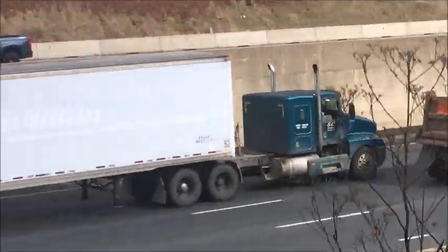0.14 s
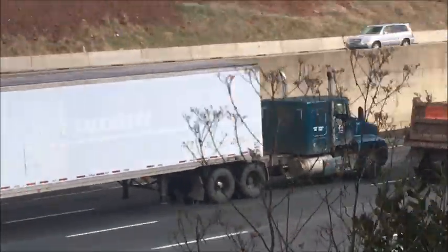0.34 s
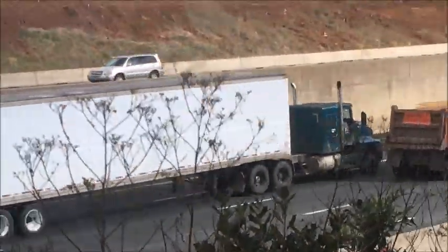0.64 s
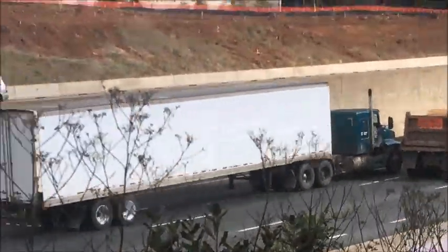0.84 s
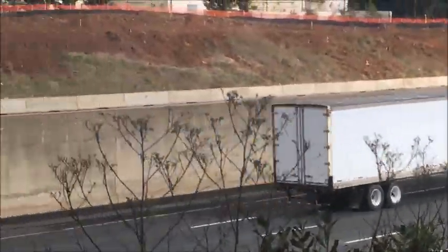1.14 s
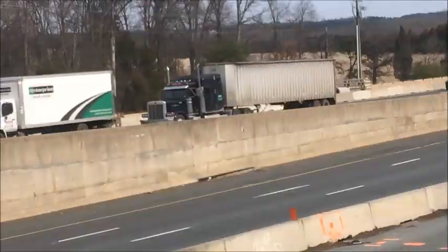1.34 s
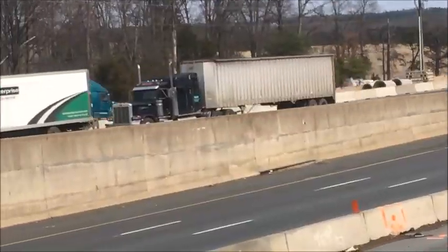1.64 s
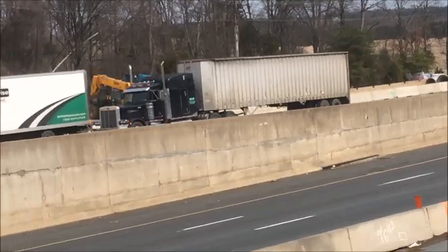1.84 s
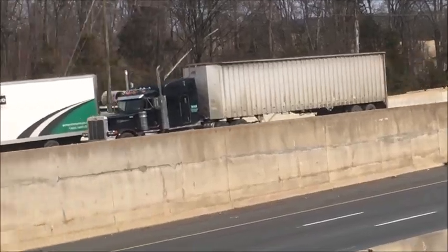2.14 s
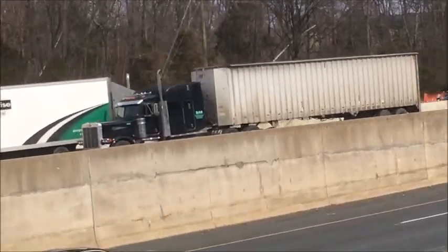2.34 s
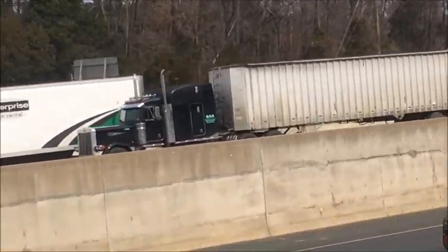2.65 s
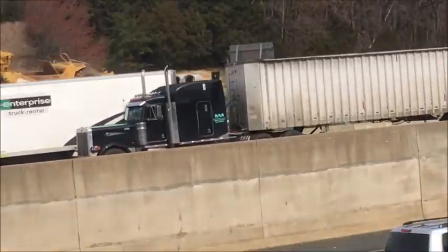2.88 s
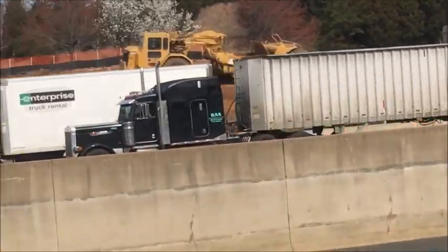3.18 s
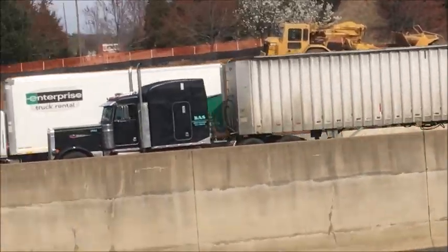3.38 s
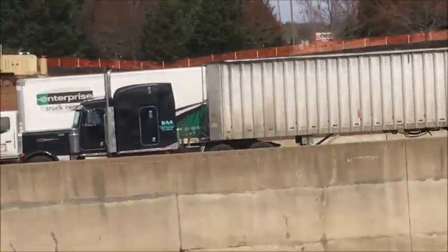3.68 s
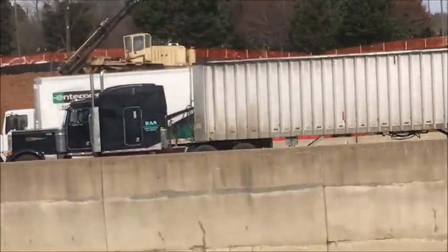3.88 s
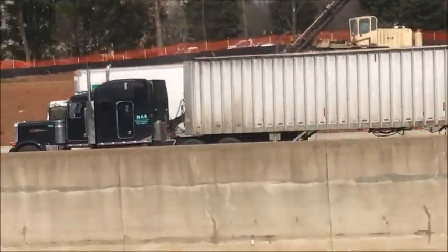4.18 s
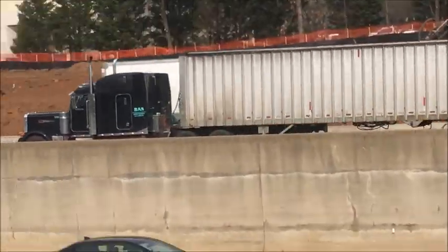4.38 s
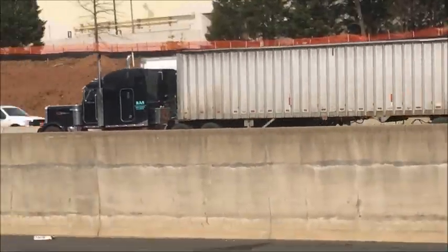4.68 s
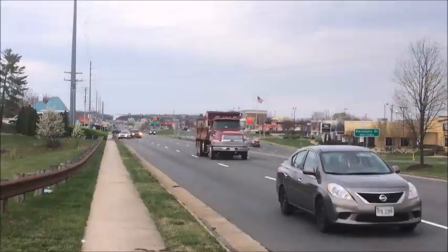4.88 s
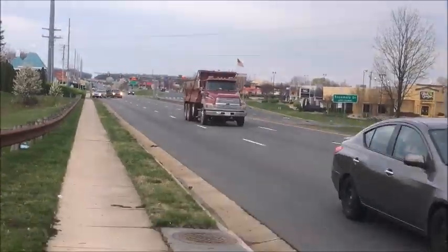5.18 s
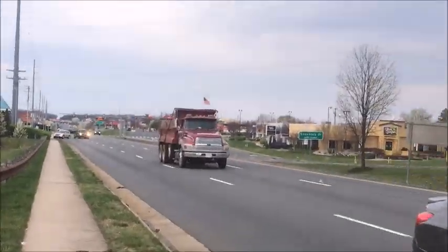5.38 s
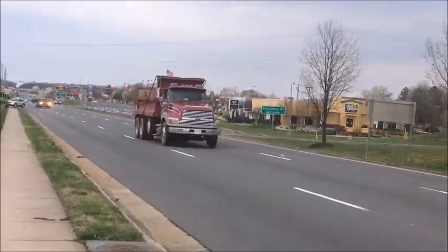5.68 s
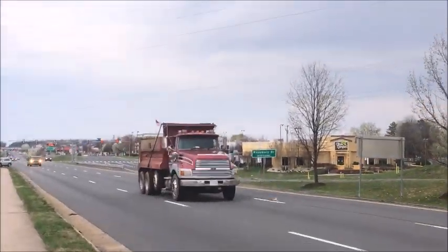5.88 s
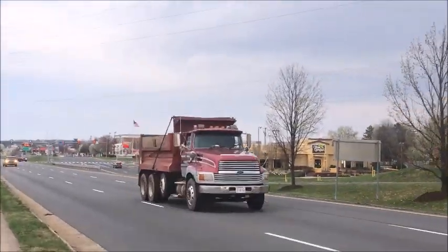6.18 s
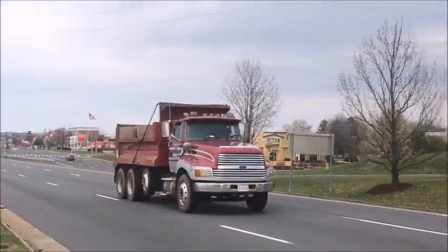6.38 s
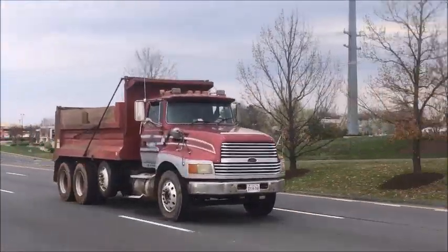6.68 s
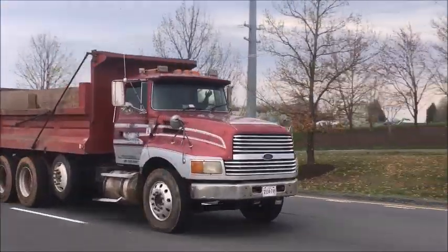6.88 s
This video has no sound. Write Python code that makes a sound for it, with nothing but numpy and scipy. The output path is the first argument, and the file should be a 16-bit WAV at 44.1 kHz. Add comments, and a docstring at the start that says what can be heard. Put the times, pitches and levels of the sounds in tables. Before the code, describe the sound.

Roadside diesel roar cuts briefly to silence, a second truck crackles rapidly on its engine brake, and a third throbs nearer, squeaks and honks twice.

```python
"""Three trucks on compression brakes

Diesel trucks pass the roadside: firing tones, exhaust pulses and gas noise over shaped tyre-noise bands.
The first drones under a turbo whistle and tread hum, gliding fuzzy tones; a brief silence follows it.
The second spits decaying noise bursts in pairs while low wind swings bump the microphone.
A dump truck throbs closer behind a car's tyres, squeaks on a warbling tone, and double-taps its air horn,
two trumpets built from harmonics.
"""
import sys
import numpy as np
from scipy import signal
from scipy.fft import rfft, irfft, next_fast_len
from scipy.io import wavfile
from scipy.ndimage import uniform_filter1d, minimum_filter1d, map_coordinates

SR = 44100
rng = np.random.default_rng(int(sys.argv[2]) if len(sys.argv) > 2 else 0)


def store_wav(level_fs):
    """Save 16-bit WAV to argv[1]."""
    pcm = np.round(np.clip(np.atleast_2d(level_fs), -1, 1) * 32767)
    wavfile.write(sys.argv[1], SR, pcm.T.astype(np.int16))


N = 310015

# Audible stretch of each truck: (start [s], end [s])
PASS_SPANS = [(0, 1.345), (1.385, 4.92), (4.92, 7.03)]

# Noise spectrum of each truck: (frequency [Hz], relative density [dB])
FIRST_COLOUR = [(53, -29), (90, -2.5), (130, -11.5), (270, -16.5), (365, -18), (504, -20), (562, -13.5),
                (793, -15.5), (1120, -13), (1220, -18), (1510, -15.5), (2710, -30), (7610, -33.5),
                (9240, -37), (15500, -44.5)]
SECOND_COLOUR = [(53, -19), (90, 0.5), (120, -7.5), (190, -13), (280, -14), (370, -22), (500, -20.5),
                 (800, -14.5), (1150, -16.5), (1800, -21.5), (2400, -29), (3500, -32.5), (5000, -42.5),
                 (15500, -57)]
THIRD_COLOUR = [(53, -34), (90, -7.5), (187, -10), (222, -14.5), (350, -19.5), (483, -27), (793, -20.5),
                (1170, -21), (1420, -26), (1550, -25.5), (1760, -30), (2230, -28), (4950, -32.5),
                (6980, -31), (15500, -35.5)]
# Firing-tone and rumble strength, before the mix: (time [s], level [dB])
FIRST_DRONE = [(0.0, -22), (0.088, -17), (0.122, -33), (0.236, -17.5), (0.584, -13), (0.606, -20.5),
               (0.822, -24.5), (0.962, -15), (1.196, -17.5), (1.33, -30)]
SECOND_DRONE = [(1.39, -26), (1.85, -30), (2.15, -24), (2.5, -29.5), (3.6, -30.5), (4.15, -35.5),
                (4.5, -30), (4.78, -19.5), (4.92, -21)]
THIRD_DRONE = [(4.95, -27), (5.108, -27.5), (6.58, -22)]
# Pass-by loudness, before the mix: (time [s], tyre roar [dB], exhaust [dB])
FIRST_PASS = [(0, -20, -21.5), (.3, -20.5, -21), (.55, -19.5, -24), (.85, -19.5, -24.5), (1.33, -23, -24)]
SECOND_PASS = [(1.39, -27, -29), (2.3, -28.5, -32), (2.5, -26.5, -28), (3.15, -25.5, -29.5),
               (3.4, -28.5, -32), (4.4, -27.5, -32.5), (4.9, -29, -27.5)]
THIRD_PASS = [(4.93, -42.5, -36), (5.2, -37, -31), (5.55, -32.5, -25.5), (5.85, -31.5, -27),
              (6.05, -34.5, -25.5), (6.55, -29, -22.5), (7.03, -33, -25.5)]
# Engine speed, before jitter: (time [s], firing rate [1/s])
FIRST_FIRING = [(0, 71), (1.33, 72.5)]
SECOND_FIRING = [(1.601, 70.1), (2.051, 83), (2.35, 82.5), (3.1, 68), (4.499, 64.94), (4.851, 61)]
THIRD_FIRING = [(4.95, 52.95), (6.2, 49), (7.03, 47.93)]
# Relative blow-down strength of successive cylinders: (level [dB])
CYLINDER_DB = [0, -2, 4.5, -1, 2, 2.5]

# Turbo whistle: (time [s], pitch [Hz], level [dB])
TURBO = [(0, 7400, -53), (.25, 8260, -51), (.55, 8970, -50), (1.3, 9300, -45), (1.5, 9500, -60),
         (1.75, 8900, -56), (2.2, 6500, -62), (2.45, 5590, -90)]
# Second, hoarser strand of the whistle: (time [s], pitch [Hz], level [dB])
TURBO_RUSH = [(0, 7550, -57), (.3, 8700, -47), (.5, 9500, -48), (.8, 9800, -54), (1.0, 9660, -60),
              (1.3, 9960, -60)]
# Tread hum of the first truck's two tyre sets: (time [s], pitch [Hz], level [dB])
DRIVE_TREAD = [(0, 364.6, -33), (.35, 373.3, -29), (.6, 367.4, -40), (.88, 364.8, -29.5), (1.1, 370, -53)]
TRAILER_TREAD = [(0, 577, -36), (.15, 569, -39), (.5, 577, -41), (.9, 572.6, -37), (1.33, 564, -28.5)]

# Wind bumps: (time [s], relative level [dB])
BUMPS = [(1.41, -21), (1.435, -18), (1.52, -20), (1.603, -16.5), (1.733, -10), (2.09, -20), (3.525, -23),
         (3.68, -20), (4.64, -22)]

# Spit spectrum: (frequency [Hz], relative gain [dB])
SPIT_COLOUR = [(150, -20), (280, 0), (450, -5), (850, 2), (1500, 2), (2500, -5), (4000, 0), (6000, -9),
               (8500, -21.5), (11000, -32), (15000, -38)]
# Strength of successive spits: (relative level [dB])
SPIT_DB = [-29.5, -28, -24, -25, -28.5, -27, -24, -20.8, -23.5, -23]

# Tyres of a car just ahead of the dump truck: (time [s], level [dB])
CAR = [(4.9, -29), (5.25, -28.5), (6.05, -36), (6.3, -58)]
# Dump truck's second harmonic grows as its stack comes into view: (time [s], level re firing tone [dB])
STACK_OCTAVE = [(4.9, -15), (5.5, -6.5), (6.3, -1.7), (7.03, 1)]
# Dump truck's tyre hiss opens up as it nears: (time [s], level [dB])
THIRD_HISS = [(4.93, -45), (5.45, -44.5), (5.55, -40.5), (6.22, -41), (6.5, -33), (7.03, -35.5)]

# Trumpet spectra: (harmonic number [-], first tap [dB], second tap [dB]), all relative
HIGH_TRUMPET = [(1, -8, -13), (2, -4.5, -4.5), (3, -1.5, -9), (4, -7, -21), (5, -7.5, -7.5), (6, -6.5, -12),
                (7, -28, -11), (8, -13, -23), (9, -20, -18), (10, -19, -24), (11, -25, -26), (12, -26, -25),
                (13, -30, -30), (14, -11.5, -17), (15, -25, -27), (16, -24, -30), (20, -24, -26),
                (27, -17, -20), (34, -28, -26), (39, -27, -26), (46, -20, -29), (57, -27, -28)]
LOW_TRUMPET = [(1, -11.5, -14), (2, -23, -18), (3, -8, -10), (4, -24, -30), (5, -22, -17), (6, -10, -9),
               (7, -7, -14), (8, -16, -21), (9, -26, -13), (10, -17, -26), (11, -22, -25), (12, -29, -27),
               (13, -17, -19), (16, -34, -28), (18, -30, -27), (19, -18, -14), (20, -34, -38),
               (21, -13, -18), (22, -29, -28), (24, -30, -34), (30, -26, -33), (36, -23, -23),
               (50, -25, -27), (62, -25, -29), (76, -30, -29)]

# Spits: a weaker crack leads each main one
SPIT_START_S, SPIT_PERIOD_S, SPIT_LEAD_S = 2.4685, .0883, .0165
SPIT_LEAD_DB = -4.5

SQUEAK_START_S, SQUEAK_END_S, SQUEAK_FADE_DB_PER_S = 5.79, 6.15, 450
SQUEAK_HZ, SQUEAK_SAG_HZ_PER_S, SQUEAK_DB = 7200, 1200, -41
WARBLE_HZ, WARBLE_PERIOD_S = 249, .12

HORN_START_S, HORN_END_S, HORN_DB = 6.644, 6.853, -6.5
HORN_ATTACK_DB_PER_S, HORN_RELEASE_DB_PER_S = 950, 370
HORN_NEARS_DB_PER_S = 11.5  # grows as the truck comes closer
HORN_DULLS_DB_PER_DB = 0.82  # brassiness lost per dB of envelope
HORN_HZ, HORN_SHARP_HZ, HORN_SETTLE_S = 258.2, 5.5, .02
EASE_S, EASE_WIDTH_S, EASE_DB = 6.743, 0.021, 13  # treble dip between the taps
TAP_SHIFT_S = 0.042  # time to cross from first-tap to second-tap colour

CEILING_DB, RESPONSE_S, HOLD_S = -8.5, 0.018, .4  # ceiling in dB rms
TOP_HZ = 15750


def amp(db):
    """Decibels to gain."""
    return 10 ** (np.asarray(db) / 20)


def unit(x):
    """Scale to rms 1."""
    return x / np.sqrt(np.mean(x ** 2) + 1e-20)


def clock():
    """Time of every sample [s]."""
    return np.arange(N) / SR


def curves(rows):
    """Interpolate each column after the time to one value per sample."""
    time_s, *columns = np.transpose(rows)
    return [np.interp(clock(), time_s, c) for c in columns]


def along(points, hz):
    """Interpolate (Hz, value) points on a log axis."""
    f, v = np.transpose(points)
    return np.interp(np.log(hz + 1), np.log(f + 1), v)


def wobble(rate_hz):
    """Smooth random curve with rate_hz knots a second."""
    knots = rng.standard_normal(int(N * rate_hz / SR) + 4)
    return map_coordinates(knots, [clock() * rate_hz])


def filtered(x, response):
    """Apply a gain that is a function of frequency."""
    size = next_fast_len(N + SR // 2)
    hz = np.fft.rfftfreq(size, 1 / SR)
    return irfft(rfft(x, size) * response(hz), size)[:N]


def band(hz, low_hz, high_hz, order=4):
    """Band-pass gain."""
    below = 1 + (low_hz / (hz + 1)) ** (2 * order)
    above = 1 + (hz / high_hz) ** (2 * order)
    return (below * above) ** -.5


def noise(low_hz, high_hz, order=4):
    """Band of noise at rms 1."""
    return unit(filtered(rng.standard_normal(N), lambda hz: band(hz, low_hz, high_hz, order)))


def patchy(depth_db):
    """White noise with drifting patches of gain in time and frequency, as from many moving sources."""
    z = signal.stft(rng.standard_normal(N), nperseg=2048)[2]
    field = uniform_filter1d(rng.standard_normal(z.shape), size=5, axis=0)
    field = uniform_filter1d(field, size=7, axis=1)
    return unit(signal.istft(z * amp(depth_db * unit(field)), nperseg=2048)[1][:N])


def echoes(x, spread_s, wet_db, count=14):
    """Road, barriers and truck bodies return a scatter of weak copies."""
    delays_s = rng.uniform(.1, 1, count) * spread_s
    gains = rng.standard_normal(count)
    gains *= amp(wet_db) / np.linalg.norm(gains)
    return x + sum(g * np.pad(x, (int(d * SR), 0))[:N] for d, g in zip(delays_s, gains))


def held(start_s, end_s, attack_db_per_s, release_db_per_s):
    """Envelope in dB: rises to 0 at the start, holds, falls after the end."""
    rise = -attack_db_per_s * np.maximum(start_s - clock(), 0)
    return rise - release_db_per_s * np.maximum(clock() - end_s, 0)


def blowdowns(turns, scatter_db):
    """One pulse per firing, sized by its cylinder, and the decaying puff of gas that follows."""
    at = np.flatnonzero(np.diff(np.floor(turns)))
    pulses = np.zeros(N)
    pulses[at] = amp(np.resize(CYLINDER_DB, len(at)) + scatter_db * rng.standard_normal(len(at)))
    puff_decay_s = 0.011
    puffs = signal.lfilter([1], [1, -np.exp(-1 / (puff_decay_s * SR))], pulses)
    return unit(pulses), unit(puffs)


def truck(drone, passing, firing, colour, tone_db, octave_db, rumble_db, pulse_db, wash_db,
          roar_db, rasp_db, hiss_db, rasp_grows, hiss_grows, chop):
    """Firing tone, exhaust pulses and gas rasp from the stack, over tyre roar and hiss."""
    tone = amp(curves(drone)[0])
    roar, exhaust = amp(curves(passing))
    swell_db = np.mean(curves(passing), axis=0) - np.mean(np.array(passing)[:, 1:])
    turns = np.cumsum(curves(firing)[0] * (1 + .007 * wobble(14))) / SR  # one turn per firing
    pulses, puffs = blowdowns(turns, scatter_db=2.5)
    gas = unit(1 + chop * puffs)  # the rush swells with every blow-down

    def shaped(x, low_hz, high_hz):
        """Truck's spectrum within one band, at rms 1."""
        return unit(filtered(x, lambda hz: amp(along(colour, hz)) * band(hz, low_hz, high_hz)))

    fundamental = amp(tone_db + wobble(33)) * np.sin(2 * np.pi * turns)
    octave = amp(octave_db + 1.0 * wobble(5.9)) * np.sin(4 * np.pi * turns)
    rumble = amp(rumble_db) * noise(44.0, 94.6, order=6)
    out = tone * (np.sqrt(2) * (fundamental + octave) + rumble)

    exhaust_flutter = amp(0.71 * wobble(10))
    popping = amp(pulse_db) * shaped(echoes(pulses, spread_s=.03, wet_db=-1.0), 86, 400)
    wash = amp(wash_db) * shaped(patchy(1.55), 113.0, 613)
    out += exhaust * exhaust_flutter * (popping + wash)

    roar_gain = roar * amp(roar_db + 0.25 * wobble(25))
    out += roar_gain * shaped(gas * patchy(1.8), 463, 1840)
    rasp_gain = amp(rasp_db + rasp_grows * swell_db + 0.68 * wobble(22))
    out += rasp_gain * shaped(gas * patchy(2.0), 1865, 4660)
    hiss_gain = amp(hiss_db + hiss_grows * swell_db + 0.79 * wobble(22))
    return out + hiss_gain * shaped(gas * patchy(1.0), 4550, 23000)


def whistle(track, fuzz_hz, flutter_db):
    """Narrow, fuzzy tone: random quadrature gains spread a carrier gliding in pitch and level."""
    hz, db = track
    phase = 2 * np.pi * np.cumsum(hz) / SR
    fuzz = wobble(fuzz_hz) * np.cos(phase) + wobble(fuzz_hz) * np.sin(phase)
    return amp(db) * unit(fuzz * amp(flutter_db * wobble(60)))


def bumps():
    """Wind shoves the microphone: low swings with turbulence that reaches higher in a hard shove."""
    out = np.zeros(N)
    puff, flurry = noise(110, 190, order=3), noise(250, 520)
    rise_s, swing_hz = .009, 76
    for s, db in BUMPS:
        t = np.maximum(clock() - s, 0)
        swell = t / rise_s * np.exp(1 - t / rise_s)
        swing = np.sin(2 * np.pi * swing_hz * t)
        out += amp(db) * swell * (swing + .5 * puff + .25 * amp(db) * flurry)
    return out


def spits(decay_s, chuff_s, level_db, chuff_db, thud_db):
    """Gas bursts crack, sputter and die within milliseconds, inside a duller chuff."""
    burst, chuff = np.zeros(N), np.zeros(N)
    for cycle, db in enumerate(SPIT_DB):
        for early_s, crack_db in ((SPIT_LEAD_S, db + SPIT_LEAD_DB), (0, db)):
            t = clock() - (SPIT_START_S + cycle * SPIT_PERIOD_S - early_s)
            burst += amp(crack_db) * (t >= 0) * np.exp(-np.abs(t) / decay_s)
            chuff += amp(crack_db) * np.exp(-np.abs(t) / chuff_s)  # swells before the crack too
    sputter = unit(rng.standard_normal(N) * amp(3.6 * wobble(800)))
    crack = filtered(burst * sputter, lambda hz: amp(along(SPIT_COLOUR, hz)))
    body = amp(chuff_db) * noise(540, 3250, order=3) + amp(thud_db) * noise(250, 420)
    return amp(level_db) * crack + chuff * body


def car():
    """Car's tread noise, one broad hump, over the boom of its exhaust."""
    tread = unit(filtered(patchy(2.3), lambda hz: band(hz, 980, 2160, order=5)))
    boom = noise(122, 158, order=7)
    return amp(curves(CAR)[0] + 1.0 * wobble(14)) * (tread + amp(-1.5) * boom)


def squeak():
    """A dry joint chirps as the engine shakes it: sinking, warbling pitch, level shaken at firing rate."""
    t = np.clip(clock() - SQUEAK_START_S, -1, 1)
    warble = WARBLE_HZ * np.cos(2 * np.pi * t / WARBLE_PERIOD_S)
    hz = SQUEAK_HZ - SQUEAK_SAG_HZ_PER_S * t + warble + 90 * wobble(50)
    envelope_db = held(SQUEAK_START_S, SQUEAK_END_S, SQUEAK_FADE_DB_PER_S, SQUEAK_FADE_DB_PER_S)
    db = SQUEAK_DB + 2 * wobble(30) + envelope_db
    shake = amp(4 * np.sin(2 * np.pi * np.cumsum(curves(THIRD_FIRING)[0]) / SR))
    return unit(shake) * whistle((hz, db), fuzz_hz=800, flutter_db=2.8)


def horn_blast():
    """Pitch [Hz], level [dB] and brassiness [dB] as the valve opens, eases and shuts."""
    t = clock()
    open_db = held(HORN_START_S, HORN_END_S, HORN_ATTACK_DB_PER_S, HORN_RELEASE_DB_PER_S)
    hz = HORN_HZ + HORN_SHARP_HZ * np.exp(np.minimum((HORN_START_S - t) / HORN_SETTLE_S, 1))
    db = HORN_DB + HORN_NEARS_DB_PER_S * (t - HORN_START_S) + open_db
    ease = np.exp(-((t - EASE_S) / EASE_WIDTH_S) ** 2)
    brass_db = HORN_DULLS_DB_PER_DB * open_db - EASE_DB * ease
    return np.array([hz, db, brass_db])


def trumpet(harmonics, ratio, level_db, count):
    """A reed chops the air; higher pressure steepens the wave and brings out the brassy treble."""
    blast = horn_blast()
    on = blast[1] > -60  # skip the inaudible part
    t, (hz, db, brass_db) = clock()[on], blast[:, on]
    phase = 2 * np.pi * np.cumsum(ratio * hz * (1 + 0.0015 * wobble(120)[on])) / SR
    second_tap = np.clip((t - EASE_S) / TAP_SHIFT_S, 0, 1)
    rows, out = np.array(harmonics), np.zeros(N)
    for k in range(1, count + 1):
        treble = min(k * ratio / 24, 1)
        tap_db = np.array([along(rows[:, [0, 1]], k), along(rows[:, [0, 2]], k)])
        early, late = tap_db + 2.5 * treble * rng.standard_normal(2)
        level = db + level_db + early + (late - early) * second_tap + treble * brass_db
        out[on] += amp(level) * np.sin(k * phase + rng.uniform(0, 2 * np.pi))
    return out


def air_horn():
    """Two trumpets a fourth apart, with a little escaping air and a few echoes off the road."""
    _, db, brass_db = horn_blast()
    high = trumpet(HIGH_TRUMPET, 1, level_db=0.5, count=60)
    low = trumpet(LOW_TRUMPET, 193 / 258.5, level_db=-0.5, count=80)
    air = amp(db + brass_db - 25.5) * noise(600, 12000, order=1)
    return echoes(high + low + air, spread_s=.04, wet_db=-21)


def scene():
    """Each truck sounds in its own stretch of time; a brief silence follows the first."""
    first = truck(FIRST_DRONE, FIRST_PASS, FIRST_FIRING, FIRST_COLOUR,
                  tone_db=-0.5, octave_db=-26, rumble_db=-6.5, pulse_db=-8, wash_db=-1,
                  roar_db=0.0, rasp_db=-30, hiss_db=-38.5, rasp_grows=0.58, hiss_grows=.6, chop=0.2)
    second = truck(SECOND_DRONE, SECOND_PASS, SECOND_FIRING, SECOND_COLOUR,
                   tone_db=-4.0, octave_db=-28, rumble_db=-2.5, pulse_db=-10, wash_db=-1.0,
                   roar_db=0.96, rasp_db=-36.5, hiss_db=-49.0, rasp_grows=0, hiss_grows=.2, chop=0.28)
    third = truck(THIRD_DRONE, THIRD_PASS, THIRD_FIRING, THIRD_COLOUR,
                  tone_db=-0.5, octave_db=curves(STACK_OCTAVE)[0], rumble_db=-5.0, pulse_db=-6.0,
                  wash_db=-2, roar_db=2.5, rasp_db=-39, hiss_db=curves(THIRD_HISS)[0],
                  rasp_grows=.2, hiss_grows=0, chop=0.31)
    turbo = whistle(curves(TURBO), fuzz_hz=520, flutter_db=2.5)  # runs on into the second stretch
    first += turbo + whistle(curves(TURBO_RUSH), fuzz_hz=900, flutter_db=2.0)
    first += whistle(curves(DRIVE_TREAD), fuzz_hz=23, flutter_db=0.5)
    first += whistle(curves(TRAILER_TREAD), fuzz_hz=35, flutter_db=1.0)
    second += turbo + bumps()
    second += spits(decay_s=.0065, chuff_s=0.012, level_db=6.0, chuff_db=-6.5, thud_db=-8.5)
    third += car() + squeak() + air_horn()
    t = clock()
    gates = [uniform_filter1d(1. * ((t >= a) & (t < b)), size=60) for a, b in PASS_SPANS]
    return sum(gate * x for gate, x in zip(gates, (first, second, third)))[None]


def gain_control(x):
    """Loudness above the ceiling turns the gain down, and it stays down for the hold time."""
    keep = np.exp(-1 / (RESPONSE_S * SR))
    loudness = np.sqrt(signal.lfilter([1 - keep], [1, -keep], x ** 2))
    needed = amp(CEILING_DB) / np.maximum(loudness, amp(CEILING_DB))
    half = int(HOLD_S * SR / 2)
    return x * minimum_filter1d(needed, 2 * half + 1, origin=half, mode="nearest")  # looks back only


def record(dry):
    """Gain control, soft rounding of the highest peaks, then a sharp band limit."""
    x = gain_control(dry[0])
    soft = x / (1 + np.abs(x) ** 8) ** (1 / 8)
    return filtered(soft, lambda hz: hz < TOP_HZ)[None]


dry = scene()
out = record(dry)
store_wav(out)
```